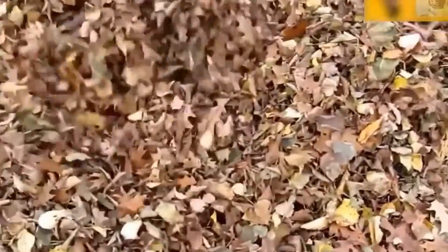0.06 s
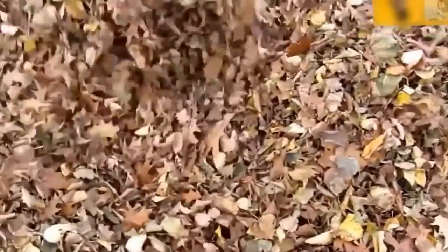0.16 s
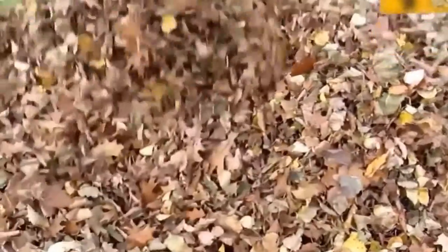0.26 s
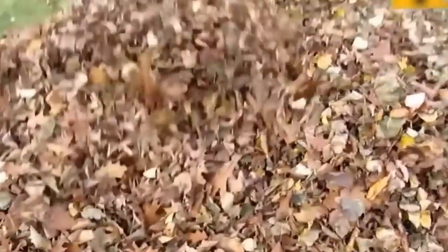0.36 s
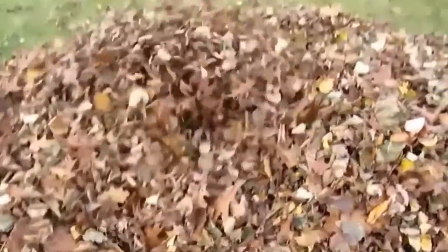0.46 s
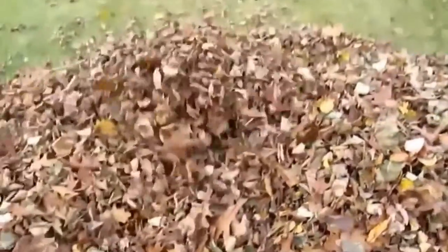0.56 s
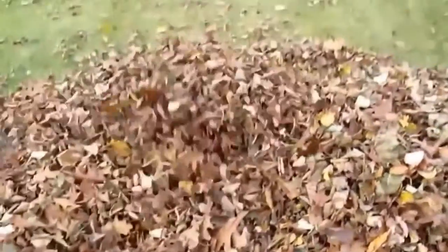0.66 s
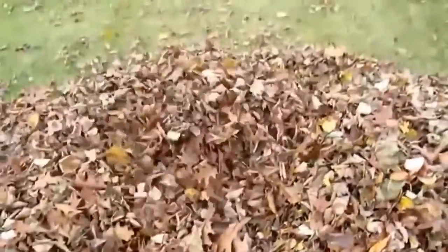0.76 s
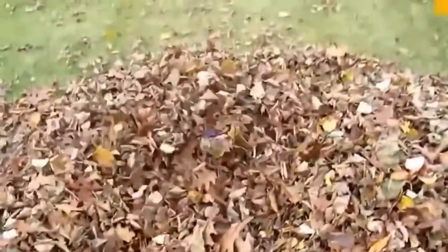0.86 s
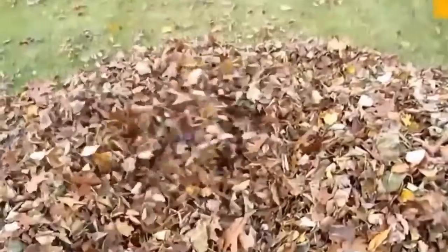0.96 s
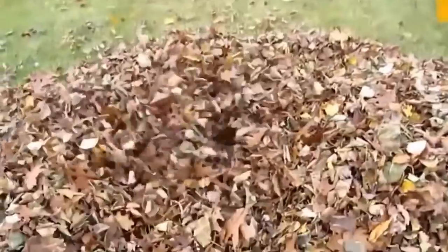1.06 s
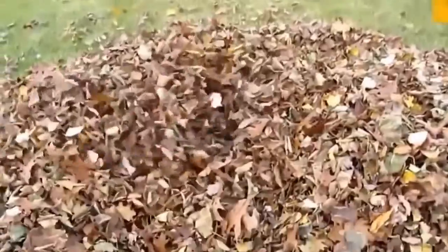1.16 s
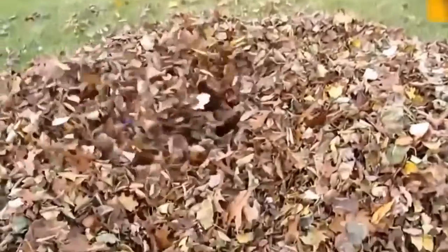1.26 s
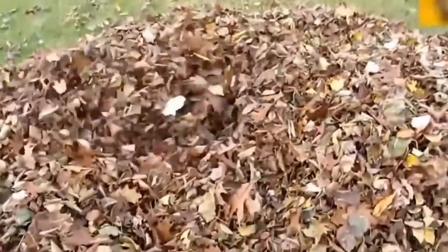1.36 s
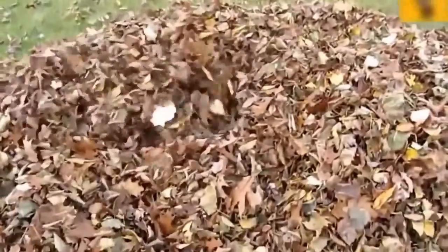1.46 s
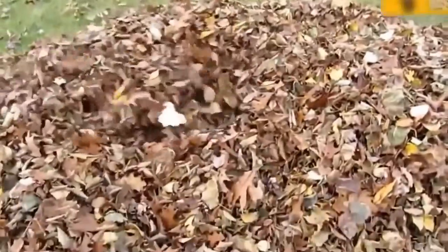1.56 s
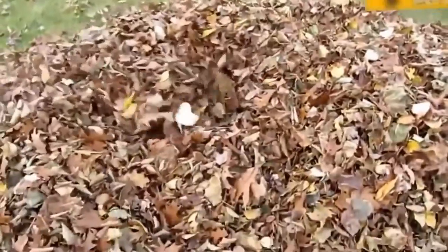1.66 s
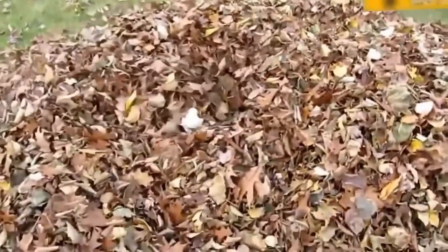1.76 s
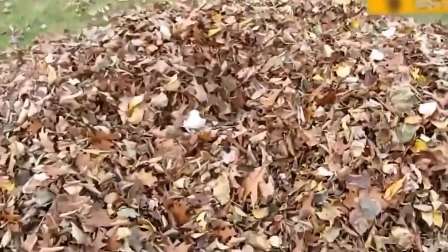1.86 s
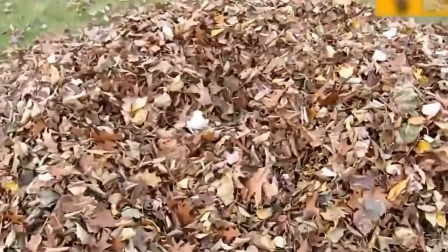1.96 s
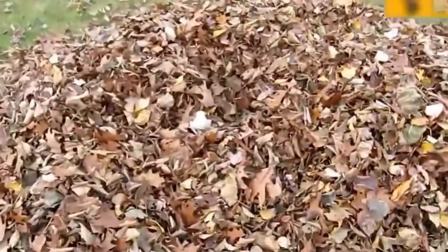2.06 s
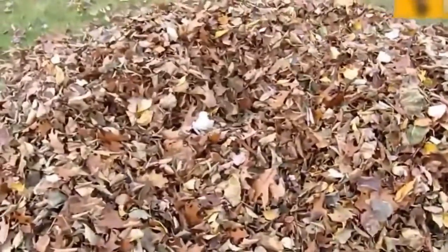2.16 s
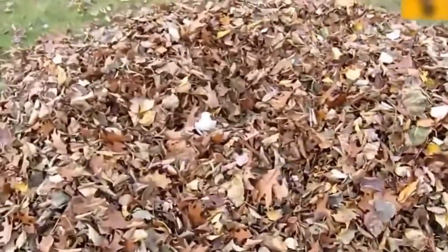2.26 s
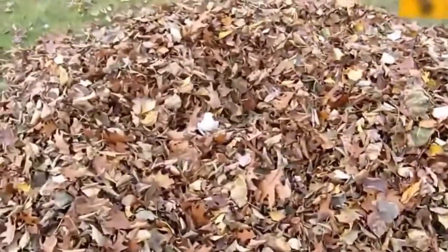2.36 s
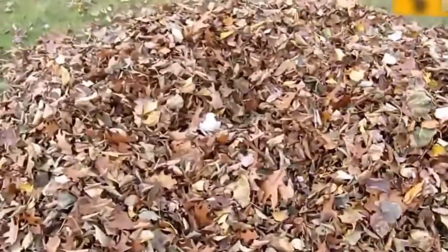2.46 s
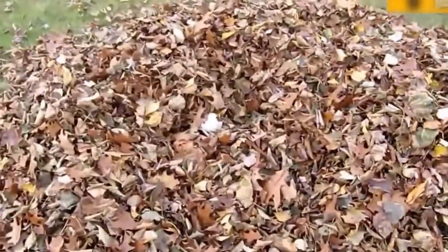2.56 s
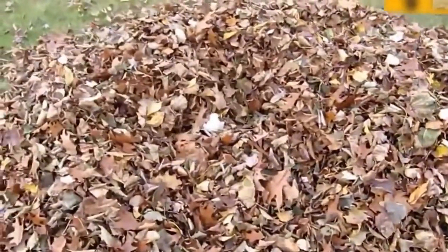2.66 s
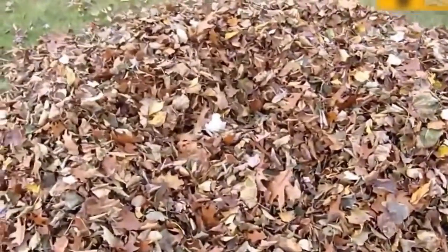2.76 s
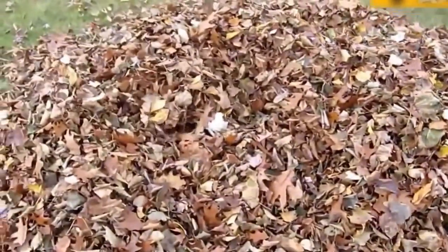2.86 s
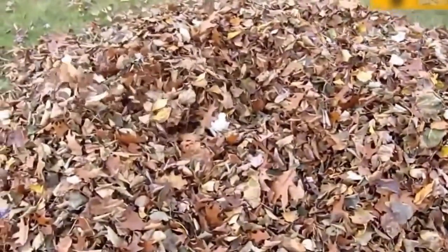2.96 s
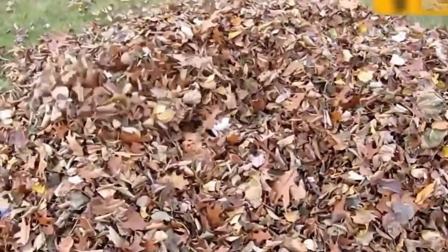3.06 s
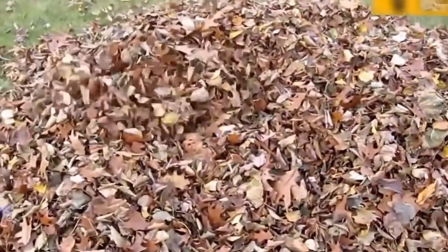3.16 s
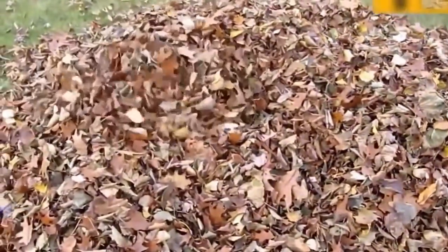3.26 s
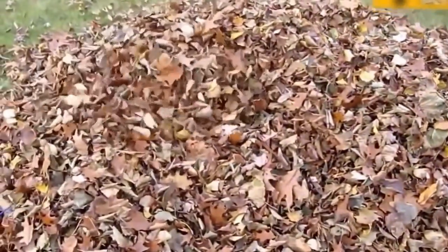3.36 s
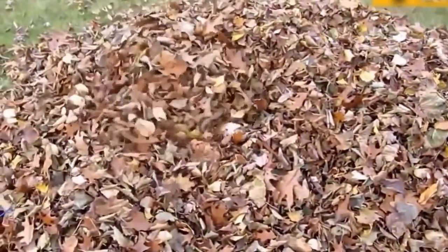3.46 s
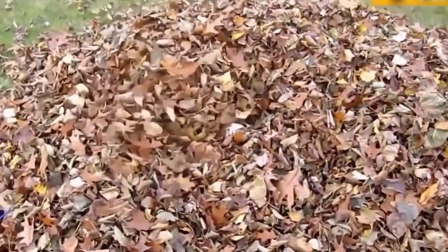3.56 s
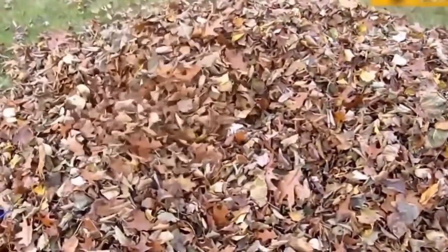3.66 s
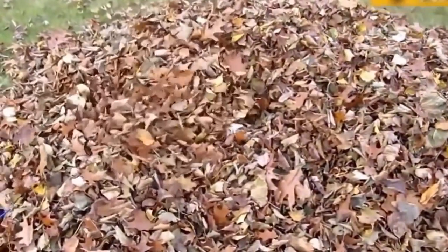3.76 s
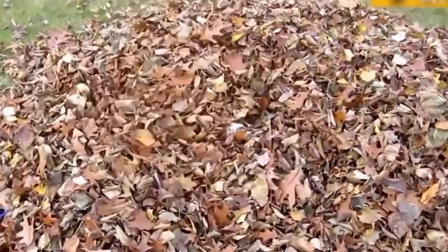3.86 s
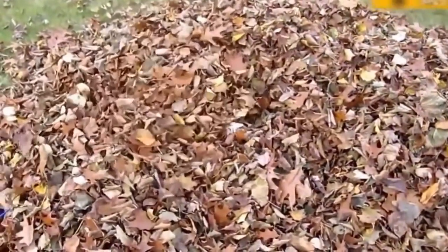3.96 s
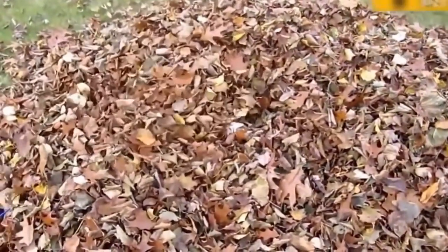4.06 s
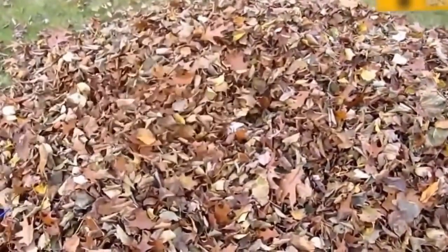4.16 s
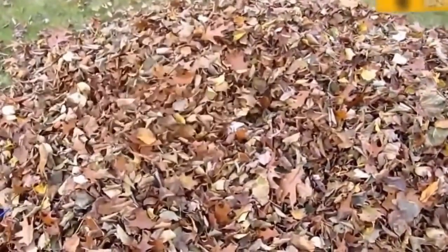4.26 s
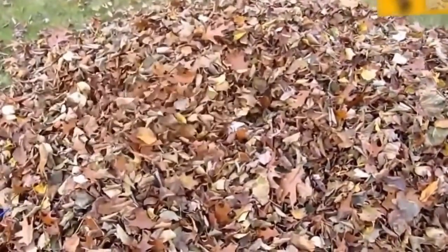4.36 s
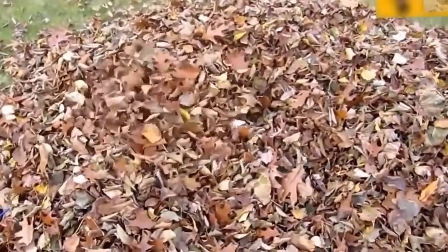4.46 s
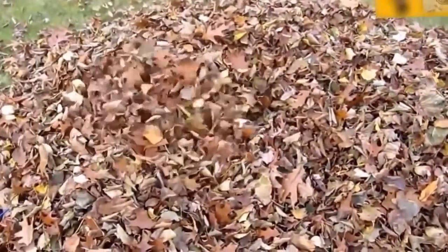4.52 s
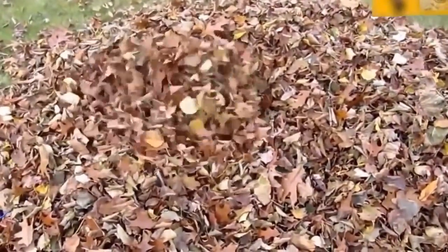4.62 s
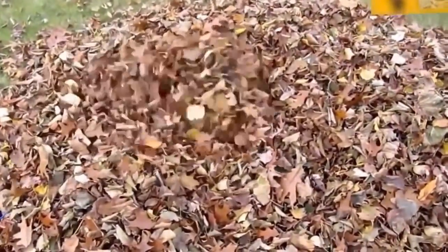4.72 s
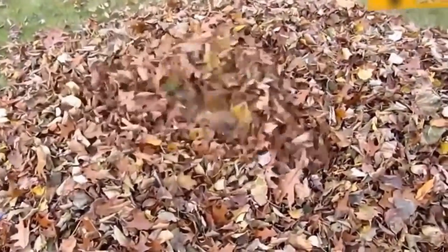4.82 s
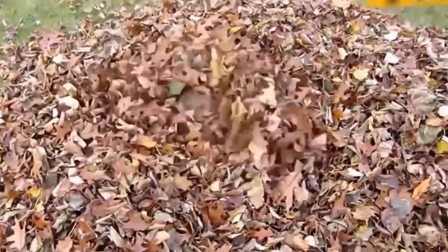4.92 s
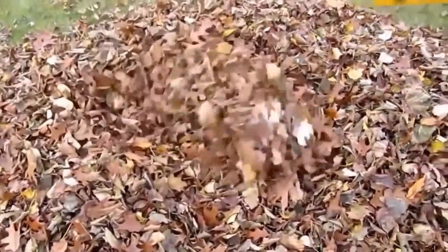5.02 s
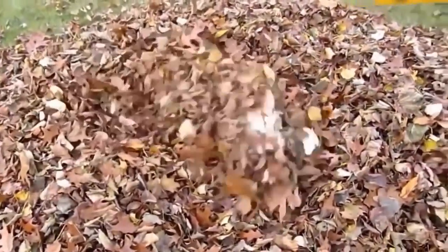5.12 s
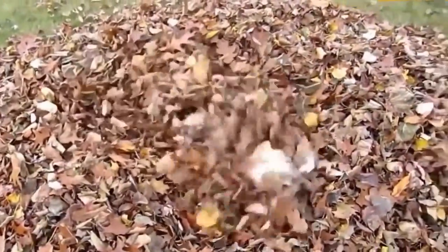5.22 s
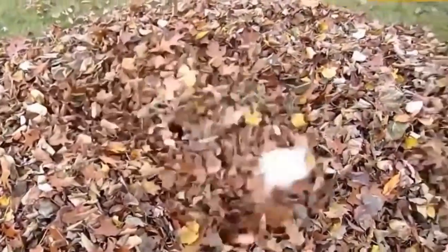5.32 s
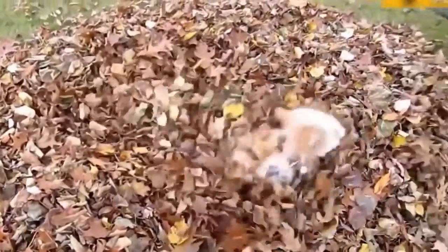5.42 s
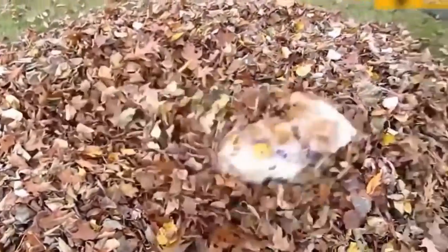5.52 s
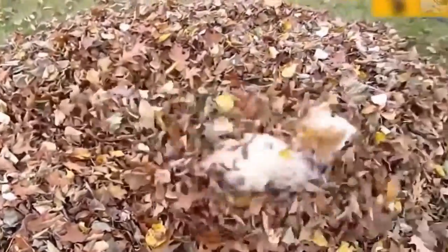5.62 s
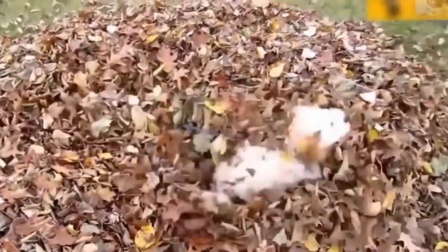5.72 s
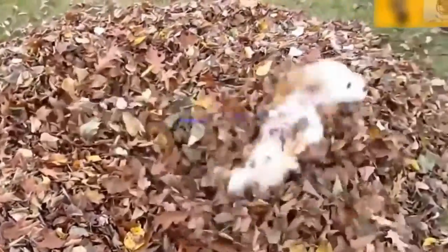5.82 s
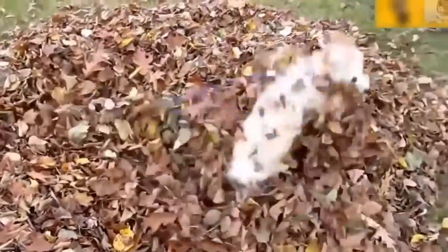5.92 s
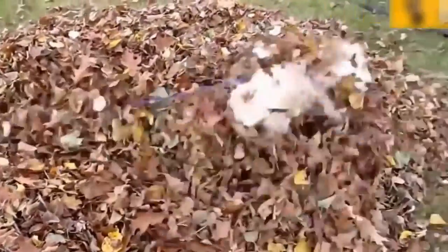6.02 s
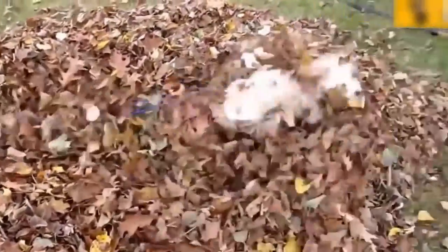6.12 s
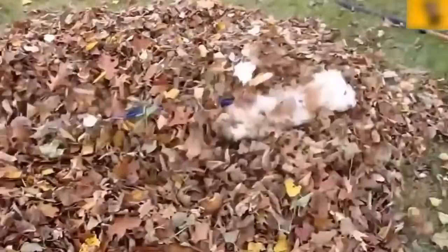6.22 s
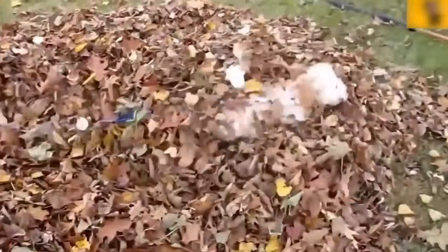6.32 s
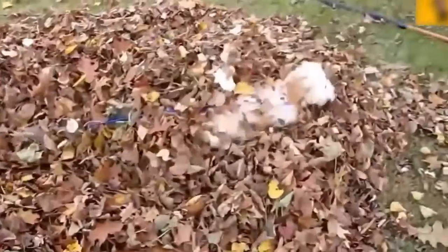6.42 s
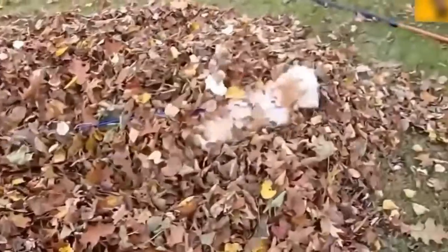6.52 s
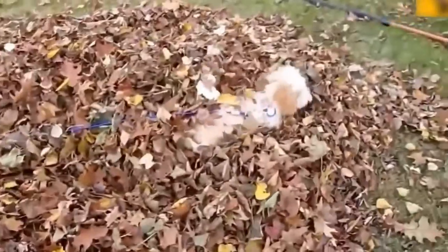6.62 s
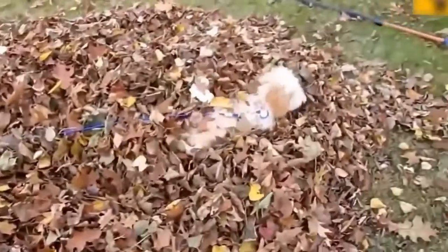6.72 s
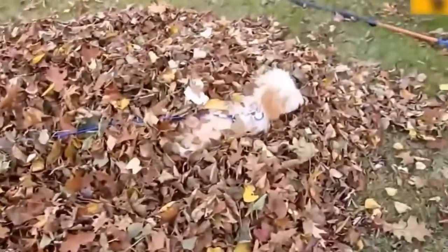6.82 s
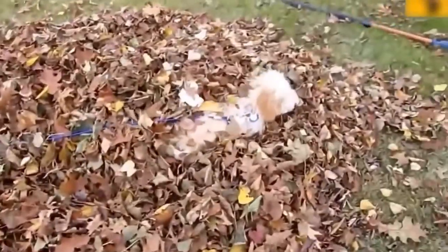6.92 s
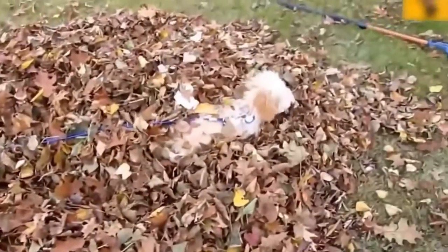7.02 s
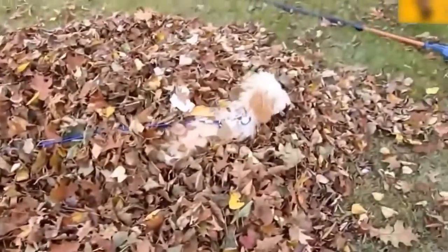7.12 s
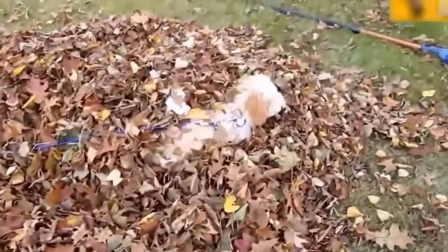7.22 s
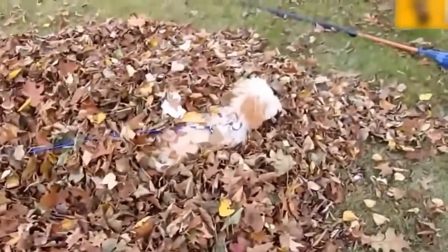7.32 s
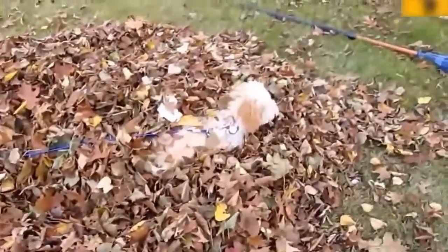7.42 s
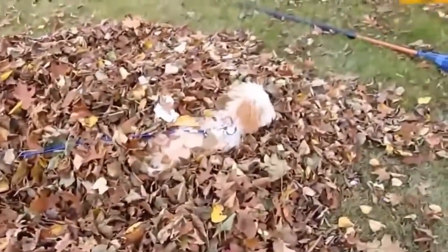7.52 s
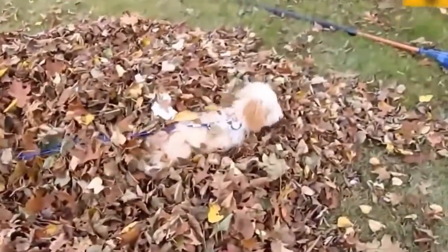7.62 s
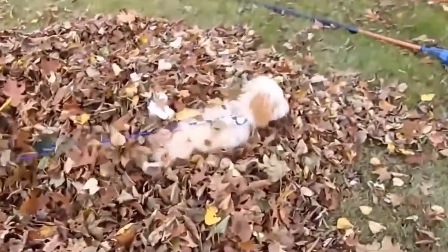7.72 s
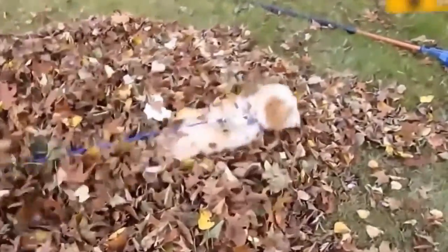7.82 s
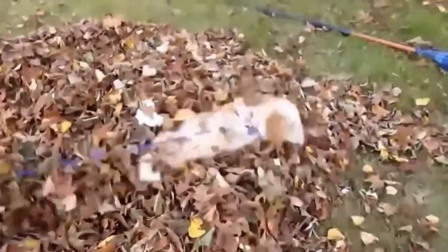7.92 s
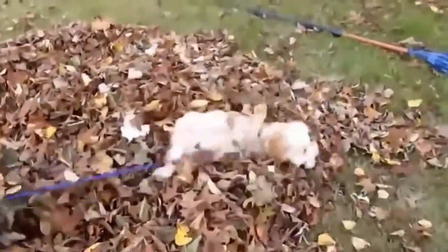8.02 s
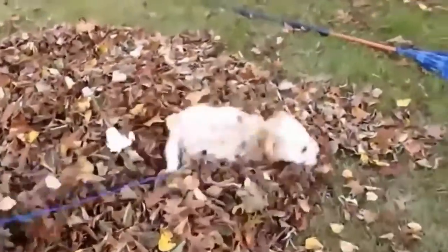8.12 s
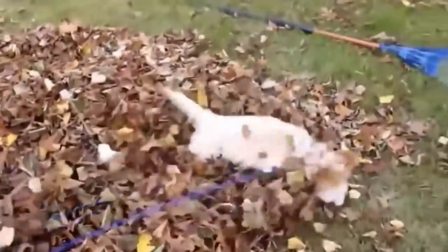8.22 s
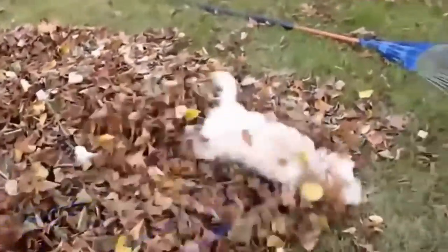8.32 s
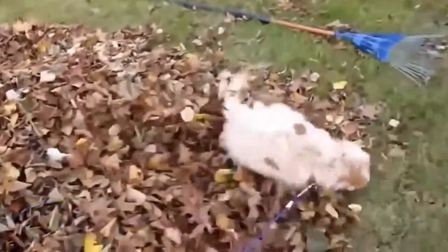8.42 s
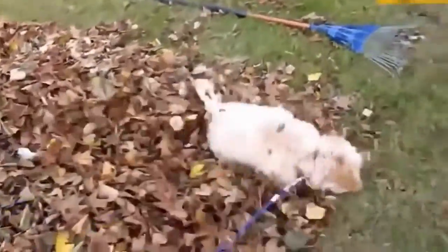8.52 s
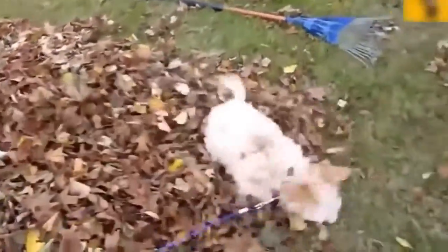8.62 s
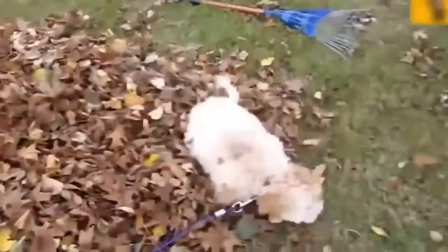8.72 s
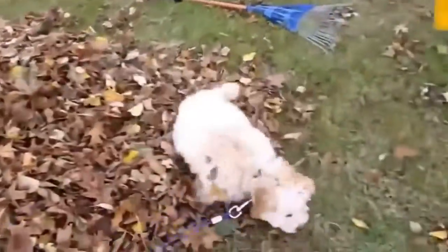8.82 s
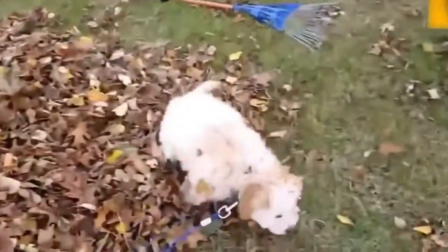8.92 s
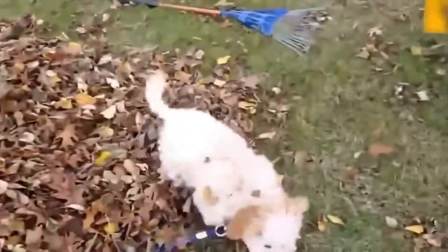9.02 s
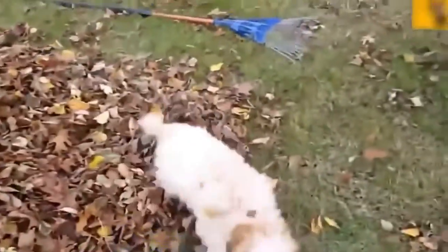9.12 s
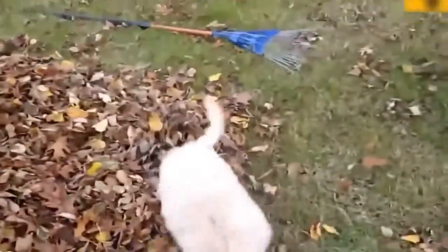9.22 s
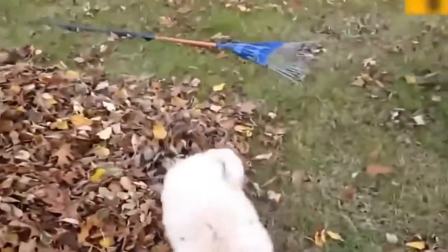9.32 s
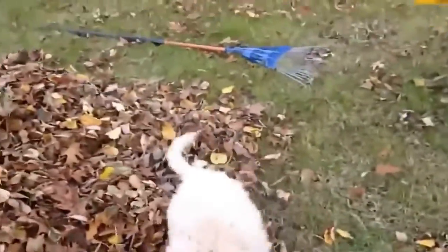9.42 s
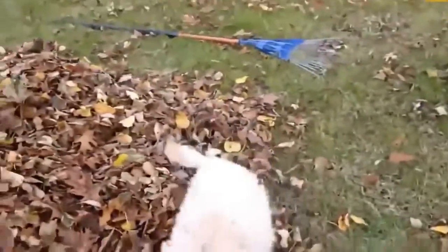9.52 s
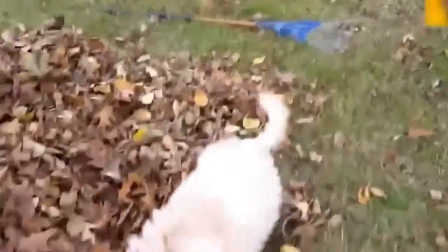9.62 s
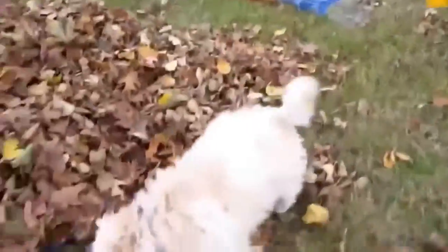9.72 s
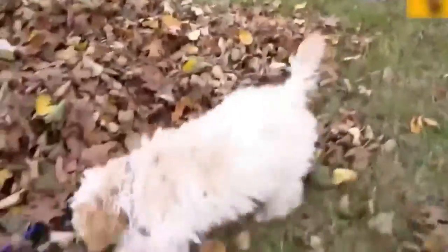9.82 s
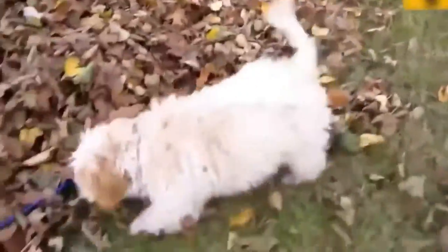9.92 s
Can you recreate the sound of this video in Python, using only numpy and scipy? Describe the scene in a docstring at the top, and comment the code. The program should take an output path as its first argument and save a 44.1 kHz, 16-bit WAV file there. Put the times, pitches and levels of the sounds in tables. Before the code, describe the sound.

A small dog works through a heap of dry leaves outdoors, heard closely and the same in both ears. Loud, dense crunching rustle is there from the start, pulsing with lunges until about 1.7 seconds, then settles into near quiet by 2.3. Faint stirring at 2.6 leads to a second, deeper-in-the-pile bout from 2.9 to 3.9. After a lull with light taps near 4.0 and 4.4, the dog breaks out at 4.5, rustling brightly and strongly until 6.5. Small rustles and a snap follow around 6.6 to 6.9, then quiet. At 7.46 the leash catch clacks sharply twice. The loudest rush swells from 7.7 to 8.7, close and crisp, then thins to lighter leaf steps with sharp stem snaps and soft low bumps until 10. Distant traffic murmur, air hiss and a barely audible engine drone around 2 seconds stay far beneath.

```python
"""Dry leaves rustle loudly from the first moment: a small dog burrows through a pile on a lawn, in bursts.
It then comes out to the near edge, by the microphone. Thousands of tiny leaf fractures merge into the
rustle, whose colour follows the dog's place in the pile. Stems snap as short noise bands, light taps are
pushes of pressure, soft bumps are dying low swings, and the leash's catch clacks with short modes.
Shaped noise makes the distant traffic and the air's hiss; a wavering sine is a far engine's drone."""
import sys
import numpy as np
from scipy import signal
from scipy.fft import rfft, irfft
from scipy.io import wavfile
from scipy.ndimage import uniform_filter1d

SR = 44100
rng = np.random.default_rng(int(sys.argv[2]) if len(sys.argv) > 2 else 0)


def put_to_file(sound):
    """Save the sound as 16-bit audio at rate SR, in the file named by the first command-line argument."""
    columns = np.atleast_2d(sound).T  # one column per channel
    safe = np.clip(columns, -1, 1)
    whole_steps = np.round(safe * 32767)
    wavfile.write(sys.argv[1], SR, whole_steps.astype(np.int16))


N = 440118
TIME = np.arange(N) / SR

# colour of the rustle at five places, from inside the pile to its near edge:
# [pitch_hz, relative_density_db (per Hz)]
PLUNGING = [(100, -25.2), (200, -16), (400, -13.5), (650, -3), (1300, -0.6), (2000, -2), (2400, -4.5),
            (3100, -0.5), (4200, 0.0), (4750, -6.5), (6900, -6), (8500, -0.6), (10000, -4.5), (11000, -7.4),
            (15600, -16)]
DEEP = [(100, -28), (200, -15), (400, -13), (650, -2.5), (1350, -0.5), (2050, -3), (2400, -10),
        (2950, -1.5), (4200, -1), (4800, -9), (7000, -7.0), (8600, -2), (10000, -5.5), (12000, -11.5),
        (15600, -22)]
BREAKING_OUT = [(120, -51), (200, -15.5), (288, -20), (321, -17), (438, -14), (814, -5), (995, -7.5),
                (1460, -3.5), (2390, -9), (3190, -0.5), (4050, -0.5), (4770, -7.5), (9710, -1), (11200, -5),
                (15600, -21)]
ON_TOP = [(120, -49), (200, -20), (480, -15), (814, -3), (892, -3), (1570, -4), (2570, -6.5), (3830, -0.5),
          (4520, -4.5), (5130, -4.5), (5940, -6), (6870, -3.5), (9190, 0.5), (11900, -4.5), (15600, -19.5)]
NEAR = [(120, -50), (200, -23), (310, -14), (372, -19), (454, -11), (642, -9.5), (757, -5.5), (876, -7),
        (1150, -4.5), (2340, -4), (4280, -0.5), (9360, -4), (15600, -13.5)]
# the dog's way: [time_s, place (0 plunging, 1 deep, 2 breaking out, 3 on top, 4 near edge)]
WAY = [(1.4, 0), (2.2, 1), (4.4, 1), (4.75, 2), (5.3, 2), (5.8, 3), (7.85, 3), (8.1, 4)]
# bouts of digging and wading; crush is packed leaves, fizz is loose ones:
# [start_s, stop_s, crackle_level_db, rise_s, settling_db_per_s, crush_over_crackle_db, fizz_over_crackle_db]
BOUTS = [(-0.3, 1.66, -28.5, .2, 37, -4.6, 0.7), (2.54, 2.774, -51, .06, 110, 0, -0.7),
         (2.88, 3.89, -30.4, .48, 65, -1.7, -0.7), (4.52, 6.48, -29, .21, 65, -5.9, 2.6),
         (6.51, 6.73, -37.3, .22, 47, -6.1, 1.3), (7.22, 7.46, -50.3, .16, 48, -4.5, -2.8),
         (7.6, 7.92, -38.5, .14, 64, -2.5, -1), (7.71, 8.71, -25.4, .47, 36, -8, -4.6),
         (8.98, 9.98, -40.9, .17, 40, -7.6, -3.6)]
# single lunges and paw steps:
# [peak_s, crackle_level_db, half_length_s (to 1/e of the power), crush_over_crackle_db, fizz_over_crackle_db]
STROKES = [(0.128, -30.3, 0.167, -1.5, -9.4), (0.527, -31.0, 0.069, -2.2, -0.2),
           (0.969, -36.0, 0.146, 5.1, -2.2), (1.299, -37.7, 0.148, 5.3, -4.8),
           (1.496, -31.5, 0.094, -4.2, -4.8), (1.9, -38.5, 0.107, -10.3, 3.7),
           (3.641, -33.3, 0.135, -1.2, 1.7), (4.627, -36.6, 0.044, 4.9, -7.7),
           (4.722, -31.1, 0.093, -3.7, -6.5), (5.318, -32.2, 0.147, -2.6, -1.5),
           (6.377, -32.0, 0.06, -0.5, -6.5), (6.924, -44.2, 0.122, -2.3, 0.8),
           (7.99, -28.4, 0.028, -8.7, -0.7), (8.16, -29.6, 0.042, -4.2, -9.7),
           (8.335, -30.4, 0.102, -6.1, -7.2), (8.754, -32.2, 0.026, -1.5, -6.6),
           (8.981, -31.9, 0.048, -2.9, -4.0), (9.162, -35.9, 0.074, -10.5, -3.2),
           (9.369, -36.3, 0.015, -13.6, -4.4), (9.501, -36.8, 0.033, -7.4, -3.8),
           (9.645, -38.0, 0.076, -3.6, -3.2), (9.91, -37.3, 0.05, -9.1, -3.5)]
# the heap never quite rests: level_db of its crush, crackle and fizz between bouts
RESTING_DB = [-60.2, -60.3, -61]
# single leaves stand out at the thin rim of the pile: [time_s, extra_level_of_crisp_breaks_db]
THIN_RIM = [(8.8, 0.5), (9.15, 6.5)]
# distant traffic: [pitch_hz, relative_density_db (per Hz)]
TRAFFIC = [(15, -28), (25, -7), (48, -9.5), (68, 1), (95, -7.5), (170, -4.5), (280, -8.5), (420, -9.5),
           (570, -2), (950, -4.5), (1600, -11.5), (3000, -56)]
# a far engine's drone: [time_s, level_db (rms)]
DRONE = [(1.2, -69), (1.7, -58), (2.3, -59), (3.2, -69), (5.0, -72)]
# light taps close at hand: [time_s, push_peak_db, half_width_s]
TAPS = [(0.3985, -18, 0.00034), (0.4004, -19.5, .00045), (4.037, -13, 0.0002), (4.3654, -34.5, 0.00029),
        (7.348, -37, 0.00056), (7.7097, -19.5, 0.00028), (7.8776, -18, 0.00027), (7.9855, -22.5, 0.00027)]
# single stems and stiff leaves snapping: [start_s, peak_db, pitch_hz]
SNAPS = [(2.588, -39, 1600), (2.921, -41, 8500), (2.927, -42, 3800), (4.342, -37, 6000), (6.602, -25, 7000),
         (7.277, -36, 4300), (7.449, -29, 2500), (7.487, -35, 2900), (7.6926, -23.5, 3500),
         (9.126, -19, 5000), (9.244, -26, 5000), (9.303, -22, 4500), (9.463, -20, 4500), (9.928, -23, 5000)]
# soft bumps of air and handling on the microphone: [start_s, level_db (of the swing before it decays), pitch_hz]
BUMPS = [(4.0381, -31, 150), (4.367, -38, 89), (6.325, -39, 85), (7.714, -36, 100), (9.488, -34, 75),
         (9.824, -43, 60.6), (9.862, -40.5, 65), (9.965, -36, 60)]
# the leash's catch clacking: [start_s, peak_db, upper_edge_hz]
CLACKS = [(7.4586, -23, 4000), (7.461, -16, 8000), (7.4821, -26.5, 2400)]
# modes of the catch: [pitch_hz, relative_level_db, t60_s]
CATCH = [(780, -16, 0.02), (1240, -10, 0.031), (2020, -16, .014), (2430, 3, 0.012), (3060, -1, 0.0098),
         (5600, -1, .007), (8500, 2, .006)]

LAYER_LAG_S = .01  # in a bout, from crush to crackle and again from crackle to fizz
UNEVEN_DB, UNEVEN_HZ = .35, 18  # the pile gives way unevenly: rms swell of each layer and its speed
SNAP_DECAY_S = .0027
TRAFFIC_DB, DRONE_HZ = -52, 114.6
EDGE_HZ = 15750  # the recorder's upper limit


def amp(db):
    """Amplitude gain of a level in dB."""
    return 10 ** (np.asarray(db) / 20)


def evened(x):
    """Scales to rms 1."""
    return x / np.sqrt(np.mean(x ** 2) + 1e-20)


def follow(rows, t):
    """The columns of a curve at the times t."""
    s, *columns = np.transpose(rows)
    return [np.interp(t, s, c) for c in columns]


def read(points, hz):
    """A spectrum in dB joined by straight lines over log frequency."""
    f, db = np.transpose(points)
    return np.interp(np.log(hz + 1), np.log(f + 1), db)


def add(mix, s, sound):
    """Mixes a sound in at s seconds."""
    part = mix[round(s * SR):][:len(sound)]
    part += sound[:len(part)]


def lowpass(x, hz):
    """A gentle two-pole roll-off."""
    return signal.sosfilt(signal.butter(2, min(hz, .45 * SR), fs=SR, output="sos"), x)


def bandpass(x, low_hz, high_hz, order=2):
    """Keeps the band between two edges."""
    edges = [low_hz, min(high_hz, .45 * SR)]
    return signal.sosfilt(signal.butter(order, edges, "bandpass", fs=SR, output="sos"), x)


def shaped_noise(gain):
    """Noise of rms 1 with the given amplitude gain at each frequency."""
    return evened(irfft(rfft(rng.standard_normal(N)) * gain, N))


def wander(hz):
    """Smooth chance of rms 1; its movement fades out around hz times a second."""
    return shaped_noise(np.exp(-(np.fft.rfftfreq(N, 1 / SR) / hz) ** 2))


def bout(t, start, stop, rise_s, fall_db_per_s):
    """Gain of a bout: it swells, holds while the dog works, and dies away as the leaves settle."""
    swell = np.sin(np.pi / 2 * np.clip((t - start) / rise_s, 0, 1)) ** 2
    return swell * amp(-fall_db_per_s * np.maximum(t - stop, 0))


def thrashing(t):
    """Power of crush, crackle and fizz at the times t: resting heap, bouts, and a brief swell per stroke."""
    power = np.outer(amp(RESTING_DB) ** 2, np.ones(len(t)))
    # packed leaves give way first, then they crackle, and the thrown ones fizz last
    layer_t = np.array([t + LAYER_LAG_S, t, t - LAYER_LAG_S])
    for start, stop, db, rise_s, fall_db_per_s, crush_db, fizz_db in BOUTS:
        levels = amp([[db + crush_db], [db], [db + fizz_db]])
        power += (levels * bout(layer_t, start, stop, rise_s, fall_db_per_s)) ** 2
    for s, db, half_s, crush_db, fizz_db in STROKES:
        levels = amp([[db + crush_db], [db], [db + fizz_db]])
        power += levels ** 2 * np.exp(-((t - s) / half_s) ** 2)
    return power


def fractures(per_s, spread_db, ring_s, count=40):
    """Clicks of uneven size, each ringing one of many leaves; every leaf has its own short, ragged response."""
    t, out = np.arange(512) / SR, np.zeros(N)
    at = np.flatnonzero(rng.random(N) < per_s / SR)
    sizes_db = spread_db * np.minimum(rng.exponential(1, N), 4)
    # denser breaks are each smaller
    sizes = amp(sizes_db) * rng.choice([-1, 1], N) / np.sqrt(per_s)
    leaf = rng.integers(0, count, N)
    for k, ring_factor in enumerate(np.geomspace(.3, 3, count)):
        ring = evened(rng.standard_normal(len(t)) * np.exp(-t / (ring_s * ring_factor)))
        mine = at[leaf[at] == k]
        out += signal.oaconvolve(np.bincount(mine, sizes[mine], N), ring)[:N]
    return evened(out)


def pile_colour(hz, t, patchy_db=2.0, echo_db=.5, echo_s=0.000443):
    """Power gain, frequency by time, of the leaves that lie between dog and microphone."""
    place, = follow(WAY, t)
    colour_db = np.zeros((len(hz), len(t)))
    for k, points in enumerate([PLUNGING, DEEP, BREAKING_OUT, ON_TOP, NEAR]):
        nearness = np.maximum(1 - abs(place - k), 0)
        colour_db += np.outer(read(points, hz), nearness)
    # a very short echo combs the spectrum until the dog is out on top
    comb_db = -echo_db * np.cos(2 * np.pi * hz * echo_s) * np.exp(-(hz / 9000) ** 2)
    colour_db += np.outer(comb_db, np.clip(3 - place, 0, 1))
    # curled leaves and the gaps between them resonate briefly, each at its own pitch
    patches = uniform_filter1d(rng.standard_normal(colour_db.shape), size=2, axis=0)
    patches = evened(uniform_filter1d(patches, size=14, axis=1))
    fewer_low = (hz / (hz + 400))[:, None]
    return amp(colour_db + patchy_db * patches * fewer_low) ** 2


def leaves(busy_per_s=22000, density_power=.4, crisp_per_s=300, crisp_db=-13, clump_db=0.39):
    """Harder thrashing breaks more leaves; the breaks come in small clumps as the pile gives way."""
    coarse = TIME[::256]
    effort = np.interp(TIME, coarse, np.sqrt(thrashing(coarse)[1]))
    busy = (effort / effort.max() + 1e-6) ** density_power
    rustle = fractures(busy_per_s * busy, spread_db=2.0, ring_s=0.00099)
    crisp = fractures(crisp_per_s * busy, spread_db=2.5, ring_s=0.00097)
    crisp_gain = amp(crisp_db + follow(THIN_RIM, TIME)[0])
    grains = evened((rustle + crisp_gain * crisp) * amp(clump_db * wander(55)))

    hz, t, z = signal.stft(grains, SR, nperseg=1024, noverlap=768)
    colour = pile_colour(hz, t)
    # crush, crackle and fizz share the spectrum from low to high
    below_crackle, below_fizz = (1 / (1 + (hz[:, None] / edge_hz) ** 12) for edge_hz in (2200, 7000))
    shares = below_crackle, (below_fizz - below_crackle).clip(0), 1 - below_fizz
    power = np.zeros(colour.shape)
    for share, layer in zip(shares, thrashing(t)):
        part = colour * share
        swell = amp(UNEVEN_DB * np.interp(t, TIME, wander(UNEVEN_HZ))) ** 2
        power += layer * swell * part / part.mean(0)
    return signal.istft(z * np.sqrt(power), SR, nperseg=1024, noverlap=768)[1][:N]


def outdoors(hiss_db=-62, hiss_hz=5000):
    """Distance: traffic murmur and hiss of air are shaped noise; the drone is a sine of wavering pitch and level."""
    murmur = shaped_noise(amp(read(TRAFFIC, np.fft.rfftfreq(N, 1 / SR))))
    phase = 2 * np.pi * DRONE_HZ * TIME + 1.6 * wander(12)
    drone = evened((1 + 0.43 * wander(7.4)) * np.sin(phase)) * amp(follow(DRONE, TIME)[0])
    hiss = evened(lowpass(rng.standard_normal(N), hiss_hz))
    return amp(TRAFFIC_DB + 0.3 * wander(5)) * murmur + drone + amp(hiss_db) * hiss


def taps(click_db=-4, click_s=.0006, click_hz=2400):
    """Each tap is one push and pull of pressure with a tiny click of contact, and no ring."""
    t, out = np.arange(-256, 256) / SR, np.zeros(N)
    for s, db, width in TAPS:
        push = -(t / width) / (1 + (t / width) ** 2 / 3) ** 3
        burst = rng.standard_normal(len(t)) * np.exp(-abs(t) / click_s)
        click = bandpass(burst, .5 * click_hz, 2 * click_hz, order=1)
        tap = push / push.max() + amp(click_db) * click / abs(click).max()
        add(out, s + t[0], amp(db) * tap)
    return out


def snaps():
    """A stem splinters in a few milliseconds, in a broad band round its own pitch."""
    t, out = np.arange(1536) / SR, np.zeros(N)
    for s, db, hz in SNAPS:
        burst = rng.standard_normal(len(t)) * np.exp(-t / SNAP_DECAY_S)
        crack = bandpass(burst, 0.73 * hz, 1.46 * hz)
        add(out, s, amp(db) * crack / abs(crack).max())
    return out


def bumps(cycles=1.0):
    """A low swing at the microphone that dies within a cycle or two."""
    t, out = np.arange(4096) / SR, np.zeros(N)
    for s, db, hz in BUMPS:
        add(out, s, amp(db) * np.sin(2 * np.pi * hz * t) * np.exp(-hz * t / cycles))
    return out


def leash(crack_db=0.0, crack_s=0.0017, lowest_hz=600):
    """A crack and short plastic modes; softer blows reach fewer of them, and so small a part gives no bass."""
    t, out = np.arange(2048) / SR, np.zeros(N)
    ring = np.zeros(len(t))
    for hz, db, t60 in CATCH:
        ring += amp(db) * np.exp(-np.log(1000) * t / t60) * np.sin(2 * np.pi * hz * t)
    for s, db, edge_hz in CLACKS:
        crack = amp(crack_db) * rng.standard_normal(len(t)) * np.exp(-t / crack_s)
        clack = bandpass(ring + crack, lowest_hz, edge_hz)
        add(out, s, amp(db) * clack / abs(clack).max())
    return out


def scene():
    """Everything reaches one microphone, heard alike in both ears."""
    mono = leaves() + outdoors() + taps() + snaps() + bumps() + leash()
    return np.tile(mono, (2, 1))


def record(dry):
    """The recorder's steep band limit."""
    limit = signal.firwin(511, EDGE_HZ, window=("kaiser", 9), fs=SR)
    return signal.oaconvolve(dry, limit[None], "same", axes=1)


dry = scene()
out = record(dry)
put_to_file(out)
```